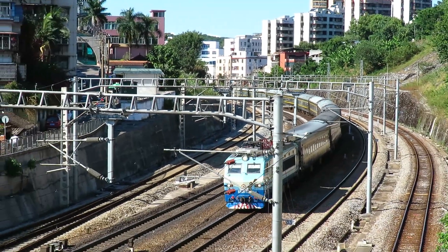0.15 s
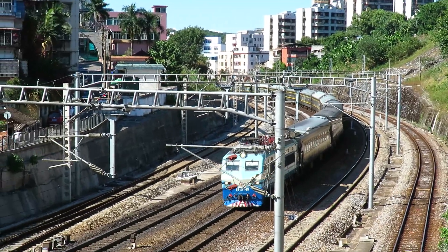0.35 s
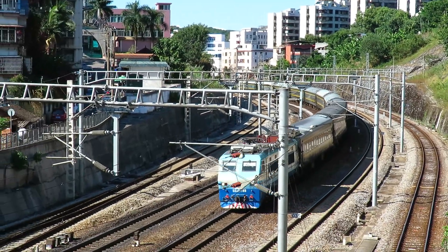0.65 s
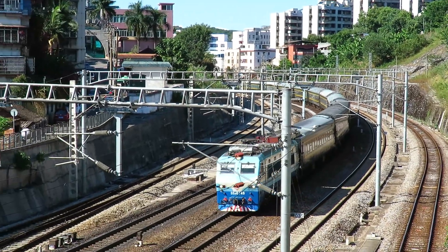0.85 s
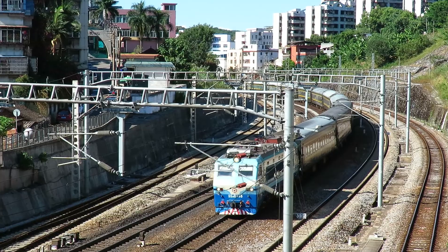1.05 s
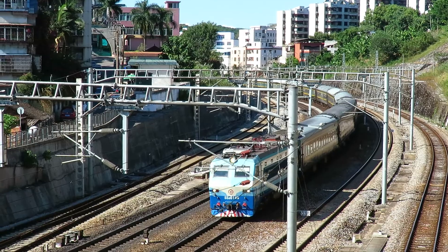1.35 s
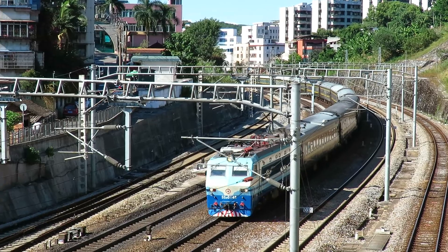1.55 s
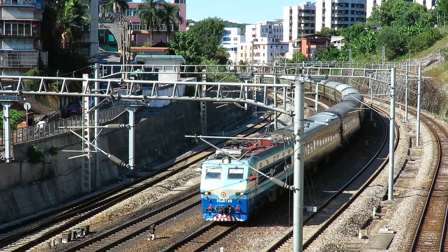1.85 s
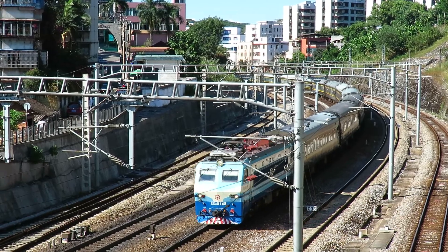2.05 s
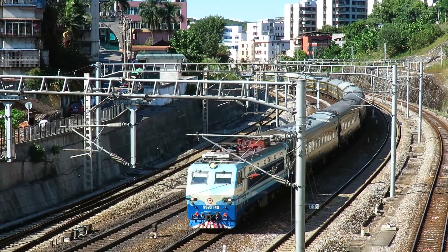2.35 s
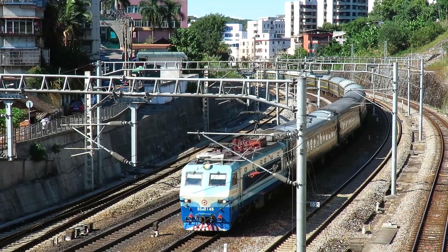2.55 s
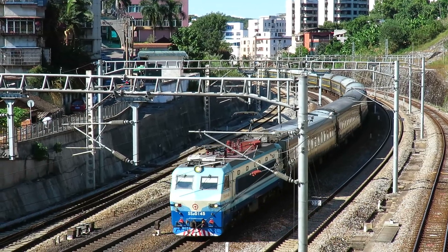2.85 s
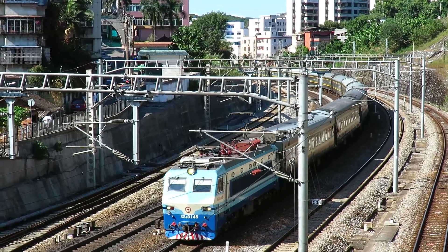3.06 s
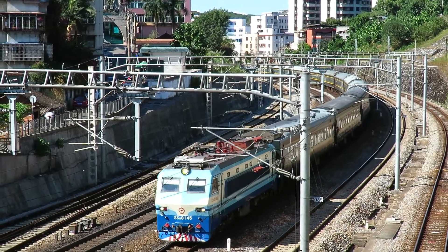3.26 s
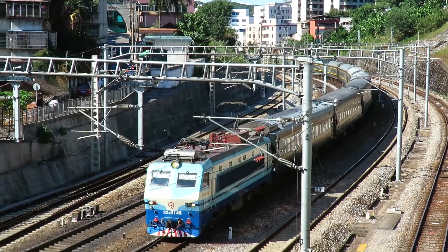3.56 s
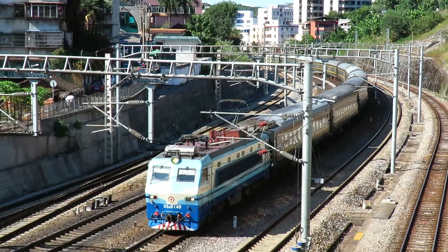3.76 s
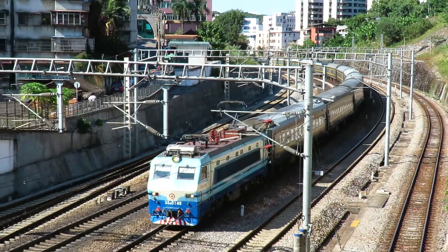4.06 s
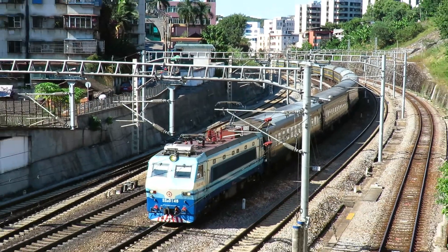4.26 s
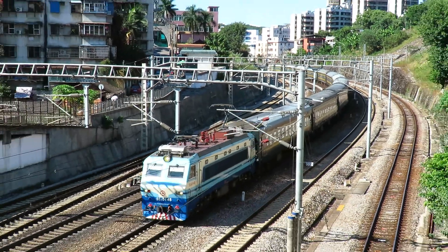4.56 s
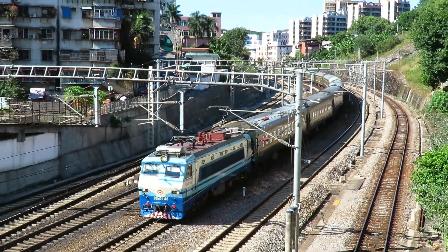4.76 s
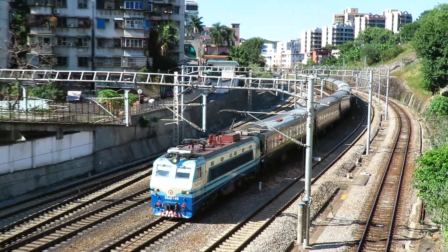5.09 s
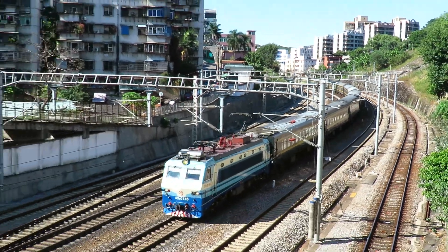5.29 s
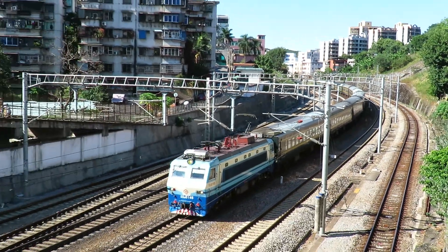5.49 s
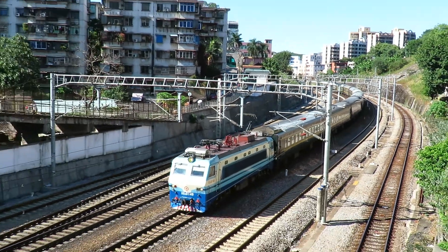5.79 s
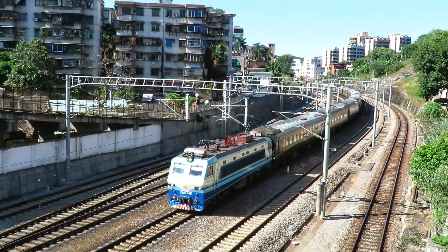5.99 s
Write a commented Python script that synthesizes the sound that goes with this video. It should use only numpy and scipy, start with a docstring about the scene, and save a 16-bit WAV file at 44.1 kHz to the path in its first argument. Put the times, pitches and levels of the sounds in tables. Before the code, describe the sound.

An electric locomotive, still far off, sounds one long, loud horn blast on a steady, slightly fluttering note. The horn cuts off suddenly and its echoes come back from surrounding walls and houses. Then the rumble of the wheels swells as the train approaches, with a wavering whine of blowers and gears and a few dull knocks. It is heard outdoors from above a railway cutting.

```python
"""Air horn in a railway cutting

From above a walled cutting: an electric locomotive, still far round the curve, sounds one long blast.
Each partial of the reed beats with its reflection from the nearest wall; once the horn is shut off,
walls and houses return it, Doppler-lowered. Then the wheels' rumble closes in on the microphones,
with the whine of blowers and gears, a low hum, a few knocks and a faint, narrow hiss near 12 kHz."""
import sys
import numpy as np
from scipy import signal
from scipy.fft import rfft, irfft, next_fast_len
from scipy.io import wavfile

SR = 44100
rng = np.random.default_rng(int(sys.argv[2]) if len(sys.argv) > 2 else 0)


def to_wav(s):
    """Save 16-bit WAV."""
    ch = np.atleast_2d(s).T  # columns
    pcm = np.round(np.clip(ch, -1, 1) * 32767)  # PCM
    wavfile.write(sys.argv[1], SR, pcm.astype(np.int16))


N = 270333
TIME = np.arange(N) / SR
HORN_OFF_S = 2.861
LEFT_RIGHT = np.array([[1], [-1]])  # opposite signs at the two microphones
FAR = np.clip(3.9 - TIME, 0, 1)  # 1 while the train is distant, 0 once it is near

# Horn pitch at the microphones, sagging as the valve shuts: (time [s], pitch [Hz])
HORN_PITCH = [(0, 417.7), (.5, 417.9), (1.2, 417.55), (2.0, 417.45), (2.7, 417.3), (2.95, 416.3)]
# Roar of the nearing wheels; hiss, gears and blower overtones follow it: (time [s], level [dB])
WHEEL_ROAR = [(0, -51.5), (2.9, -52.5), (3.9, -42.5), (4.3, -38), (4.75, -33.5), (5.72, -23.5),
              (6.13, -23.5)]


def horn(flutter_hz=38.64, throb=1.3, scatter_hz=18, wall_lag_s=0.051, release_s=0.031, ring_s=0.63):
    """A distant, fluttering reed chops air into pulses; each partial beats with its wall reflection."""
    # The reed's flutter sets in as the blast goes on: (time [s], phase swing [rad])
    flutter_depth = [(0, 0.0054), (1.1, 0.042), (1.45, 0.058), (2.9, 0.059)]
    # Moving air scatters part of each partial: (time [s], share against the steady part [ratio])
    air_scatter = [(0, 0.26), (1.2, .24), (1.5, 0.14), (2.9, 0.32)]
    # The horn's two treble bands: (time [s], blare level [dB], sizzle level [dB])
    treble_levels = [(0.0, -29, -39), (0.53, -31.5, -42), (0.68, -29.5, -40), (1.15, -31.5, -45.5),
                     (1.25, -30.5, -43), (1.49, -30, -40), (1.66, -26.5, -38.5), (1.75, -28.5, -41),
                     (2.74, -34.5, -42), (2.84, -30.5, -42)]
    phase = turn(curves(HORN_PITCH)[0]) + 0.013 * walk(16) + 0.016 * walk(81)  # jitter and rasp
    flutter = turn(flutter_hz + 0.5 * walk(3.9))
    swing, = curves(flutter_depth)
    scatter, = curves(air_scatter)
    treble_db = [db - 2 for db in curves(treble_levels)]
    multiples, timbre_db = horn_partials()
    bands = np.digitize(multiples, [7.5, 15.5])  # low, blare, sizzle
    out = np.zeros((2, N))
    for k, db, band in zip(multiples, timbre_db, bands):
        if band == 0:
            level_db, reflected, beat = low_partial(k)
            level_db = level_db + 0.56 * walk(16)
        else:
            share_db = db - 10 * np.log10(np.sum(undb(timbre_db[bands == band]) ** 2))
            level_db = treble_db[band - 1] + share_db - 0.5 * walk(16) + 1.53 * walk(6)
            reflected = 0.23 / (1 + (k * HORN_PITCH[0][1] / 4500) ** 2)  # the wall dulls the top
            beat = turn(k * 1.9) + 2 * np.pi * rng.random()
        # short waves scatter more, differ more between microphones and die first as pressure falls
        shortness = np.sqrt(k / 6)
        balance = 1 + (undb(0.72) - 1) * shortness * walk(3.4) * LEFT_RIGHT
        gain = undb(level_db + path_fading(k)) * balance
        # the paths outdoors shift each partial's flutter and turn more of it into throbbing
        shifted = flutter + 0.1 * (k - 1) * walk(1.8)
        throbbing = 1 + throb * swing * np.sqrt(k) * np.cos(shifted - 1.12)
        vibrato = swing * np.sin(shifted) / np.hypot(1, k / 26)
        # the ground reflection slowly turns the phase of the long waves
        bent = k * (phase + vibrato) + 1.96 * walk(1.39) / (1 + (k / 8) ** 2)
        mic_phase = (0.15 * shortness + 0.0066 * max(k - 12, 0)) * walk(1.8) * LEFT_RIGHT
        direct = tone(bent + mic_phase, scatter * shortness, scatter_hz)
        direct *= fade(HORN_OFF_S, release_s / shortness)
        # the reflection ends later, and the long waves ring on in the cutting
        wall = reflected * np.sqrt(2) * np.cos(bent - beat) * fade(HORN_OFF_S + wall_lag_s, ring_s / k)
        out += gain * throbbing * (wall - direct)
    return pan(out + reed_air(phase), -1.7)


def horn_partials(count=36):
    """The reed's sharp pulses hold a long harmonic series: its multiples and their levels in dB."""
    # Horn timbre: (multiple of the pitch, level [dB])
    timbre = [(1, -9.5), (2, -2.5), (3, -3.5), (4, -2), (5, -4.5), (6, -6), (7, -8), (8, -11.5), (9, -13),
              (10, -14.5), (11, -18.5), (12, -17.5), (13, -20), (14, -23), (15, -23), (16, -26.5),
              (17, -28.5), (19, -29.5), (21, -30), (24, -32), (29, -36), (31, -36), (33, -42), (36, -47)]
    multiples = np.arange(1, count + 1)
    return multiples, np.interp(multiples, *np.transpose(timbre))


def low_partial(k):
    """A low partial beats with its Doppler-shifted reflection: level in dB, reflected share, phase."""
    # Beats off the nearest wall: (multiple, level [dB], trend [dB/s], reflected share [0-1],
    # first dip [s], beat rate [Hz], quickening [Hz/s])
    wall_beats = [(1, -25.5, 0.45, 0.38, 0.75, 0.79, 0.37), (2, -20, -1, 0.53, 0.3, 2.75, 0.347),
                  (3, -22, 0, 0.32, 0.018, 3.348, 0.788), (4, -31, 3.5, 0.28, 0.12, 6.8, 0),
                  (5, -27, -0.5, 0.38, 0.073, 5.9, 1.126), (6, -33, 0.86, 0.04, 0.02, 2.6, 0),
                  (7, -29, -6, 0.23, 0.033, 6.3, 0.7)]
    _, db, trend, reflected, dip_s, beat_hz, quickening = wall_beats[k - 1]
    beat = turn(beat_hz + quickening * TIME)
    return db + trend * TIME, reflected, beat - np.interp(dip_s, TIME, beat)


def path_fading(k):
    """Paths to the microphones cancel or add now and then, so partial k dips or swells, in dB."""
    # Dips and swells: (time [s], multiple, half length [s], change [dB])
    changes = [(0.09, 11, 0.11, 8.5), (0.105, 12, 0.055, -22), (0.113, 5, 0.019, -16),
               (0.12, 1, 0.057, -18), (0.187, 7, 0.03, -12), (0.202, 10, 0.12, -11), (0.275, 5, 0.032, -27),
               (0.304, 13, 0.22, 6.5), (0.31, 1, 0.033, 5.5), (0.325, 2, 0.055, 6.5), (0.38, 4, 0.037, 8),
               (0.46, 6, 0.11, 7), (0.5, 12, 0.09, -12), (0.54, 9, 0.17, -14), (0.587, 1, 0.063, 4),
               (0.588, 2, 0.049, 7), (0.617, 5, 0.16, 5), (0.618, 3, 0.032, -29), (0.71, 8, 0.072, 7),
               (0.765, 12, 0.21, 0.5), (0.773, 4, 0.013, 6), (0.793, 1, 0.077, -22), (0.9, 4, 0.04, 5.5),
               (0.907, 1, 0.018, -23), (0.978, 3, 0.037, 4.5), (1.12, 11, 0.085, -10),
               (1.076, 1, 0.082, -17.5), (1.114, 6, 0.038, 3), (1.123, 7, 0.12, -6), (1.2, 2, 0.049, -10.5),
               (1.21, 4, 0.03, -14), (1.267, 10, 0.044, -9), (1.288, 2, 0.06, 10.5), (1.296, 3, 0.076, -2),
               (1.31, 9, 0.13, 3), (1.34, 13, 0.034, -7), (1.384, 2, 0.052, -13), (1.53, 2, 0.054, -9),
               (1.566, 6, 0.66, 5.5), (1.6, 5, 0.011, -28), (1.804, 2, 0.017, -9), (1.808, 3, 0.039, -4.5),
               (1.812, 5, 0.35, -8), (1.854, 11, 0.19, 2), (1.873, 9, 0.036, -11), (1.993, 5, 0.092, 9.5),
               (2.001, 6, 0.11, -5.5), (2.062, 1, 0.51, -8), (2.12, 4, 0.042, 3), (2.246, 4, 0.096, 4.5),
               (2.278, 1, 0.081, -28), (2.28, 2, 0.16, -5.5), (2.306, 7, 0.16, 12), (2.468, 8, 0.099, 7),
               (2.527, 2, 0.18, 4), (2.565, 5, 0.03, -4), (2.587, 8, 0.08, -10), (2.594, 7, 0.065, 13),
               (2.617, 1, 0.041, -6), (2.665, 4, 0.11, -7.5), (2.666, 3, 0.016, -3), (2.83, 12, 0.054, 8),
               (2.831, 6, 0.078, 7), (2.9, 3, 0.089, -7), (2.923, 1, 0.024, -26), (2.944, 3, 0.018, 15.5),
               (3.063, 1, 0.05, 4)]
    return sum(db * np.exp(-((TIME - s) / half_s) ** 2)
               for s, multiple, half_s, db in changes if multiple == k)


def reed_air(phase, low_hz=1700, high_hz=4300, tail_s=0.51):
    """Air rushes through the reed once a cycle and dies away slowly after the valve shuts."""
    # Rush of air: (time [s], level [dB])
    air_level = [(0, -46), (1.1, -49.5), (1.5, -54), (2.2, -56), (2.85, -59)]
    rush = rng.standard_normal((2, N)) * (1 + np.cos(phase))
    air = shape(rush, lambda f: 1 / np.sqrt((1 + (low_hz / (f + 1)) ** 8) * (1 + (f / high_hz) ** 6)))
    return unit(air) * undb(curves(air_level)[0]) * fade(HORN_OFF_S, tail_s)


def echoes(count=88, doppler=0.0035, behind_doppler=0.035, glint_hz=11, spread_db=4):
    """Walls and houses return the blast late and dull; those behind the train return it flatter."""
    # Echo strength by lateness: (delay [s], level [dB])
    echo_levels = [(.05, -28), (.14, -26), (.27, -36.5), (.42, -45), (.6, -40), (.8, -49.5), (1.3, -51),
                   (1.75, -51)]
    # The echoes stay low during the blast and swell once it stops: (time [s], gain [dB])
    swell = [(0, -16), (2.7, -17.5), (3.0, -13), (3.2, -6), (3.5, -2.5), (4.2, -9)]
    multiples, timbre_db = horn_partials()
    pitch = np.mean(np.array(HORN_PITCH)[:, 1])
    # the bell spreads its lowest partial all round, so the walls return more of it
    radiated = undb(timbre_db + 6 / multiples ** 2)
    cycle = np.arange(2048) / 2048
    # the moving horn's beam sweeps over ledges and windows, so every echo glints
    glints = [walk(glint_hz) for _ in range(12)]
    out = np.zeros((2, N))
    for i, (place, angle, side, lag) in enumerate(rng.random((count, 4))):
        delay = 0.1 + 1.675 * ((i + place) / count) ** 2.31
        behind = i % 4 == 3
        hz = pitch * (1 - (behind_doppler if behind else doppler) * angle)
        # a rough face gives each partial its own strength and lag
        face = rng.standard_normal((len(multiples), 2)) @ [1, 1j]
        dulling = 1 / 4700 + delay / 3500 + behind / 1400  # more with distance and behind the bell
        gains = face * radiated * np.exp(-multiples * pitch * dulling / 2)
        wave = np.real(gains @ np.exp(2j * np.pi * np.outer(multiples, cycle)))
        gate = np.clip((HORN_OFF_S + delay - TIME) / 0.034, 0, 1)
        level = undb(np.interp(delay, *np.transpose(echo_levels))) * glints[i % len(glints)]
        mic_lag_s = 0.0001 * (lag - 0.5) * LEFT_RIGHT
        index = (hz * (TIME + mic_lag_s) * len(cycle)).astype(int) % len(cycle)
        out += pan(wave[index] * gate * level, spread_db * (2 * side - 1) - 6)
    return out * undb(curves(swell)[0])


def rolling():
    """Wheels shake the bodies (rumble, hum), ring the rails (roar) and hiss, swelling as they near."""
    # Rumble at the microphones: (time [s], level [dB])
    rumble_level = [(0, -37), (.6, -37), (1.4, -36), (1.6, -36.5), (2.3, -43), (2.58, -41), (2.8, -49),
                    (3.28, -45.5), (3.38, -35.5), (3.8, -40.5), (4.2, -36.5), (4.6, -32.5), (5.2, -27.5),
                    (5.7, -23.5), (6.13, -23)]
    # Spectrum of the rolling noise: (frequency [Hz], density [dB])
    spectrum = [(25, -45), (45, -14.5), (100, -6.5), (140, -6.5), (200, -8.5), (270, -10), (340, -11),
                (430, -11), (580, -13), (900, -11.5), (1400, -18), (2500, -25), (4000, -38.5), (6500, -50),
                (9000, -55), (15000, -67.5)]
    # Stereo width of the train: (frequency [Hz], side minus mid [dB])
    stereo_width = [(30, -23), (80, -3.5), (160, 4.5), (380, 2), (700, -10.5), (1300, -9), (2400, -9),
                    (4400, -6), (9000, 3)]
    # Hum and body resonances: (frequency [Hz], width [Hz], level against the rumble [dB])
    resonances = [(103.3, 5.4, -12.5), (147.1, 13, -7), (269.6, 59, -3.5)]
    rumble_db = curves(rumble_level)[0] + walk(4.1)
    roar_db, = curves(WHEEL_ROAR)
    thinning_db = 4 * np.clip(3.6 - TIME, 0, 1)  # less bass from far off
    # Noise bands: (low edge [Hz], high edge [Hz], level [dB])
    bands = [(20, 170, rumble_db - 4.5 - thinning_db), (150.5, 325, rumble_db - 5.5),
             (325, 467, np.minimum(rumble_db, roar_db + 20) - 8),
             (597, 2550, roar_db - 0.8), (2730, 13000, roar_db - 16.5)]
    out = 0
    for low, high, db in bands:
        def colour(f):
            skirts = np.sqrt((1 + (low / (f + 1)) ** 12) * (1 + (f / high) ** 12))
            return undb(on_log(f, spectrum)) / skirts
        mid = shape(rng.standard_normal(N), colour)
        side = shape(rng.standard_normal(N), lambda f: colour(f) * undb(on_log(f, stereo_width)))
        flicker_db = 1.3 * walk(10) / (1 + low / 1200)  # the bass flickers, the hiss is smoother
        out += (mid + side * LEFT_RIGHT) / np.std(mid) * undb(db + flicker_db)
    for hz, width_hz, db in resonances:
        mid = tone(turn(hz), 3.8, width_hz)
        side = undb(-9) * tone(turn(hz), 20, width_hz)
        out += undb(rumble_db + db - 20 * FAR) * (mid + side * LEFT_RIGHT)
    return pan(out, -0.3)


def blowers(lower_ratio=0.97):
    """The blowers sing one wavering note with overtones; a second, slightly lower tone beats with it."""
    # Blower pitch at the microphones: (time [s], pitch [Hz])
    pitch = [(3, 501.5), (4.6, 501), (5.4, 499.8), (6.13, 498.8)]
    # Main note and its octave: (time [s], note level [dB], octave level [dB])
    levels = [(2.8, -58, -58.5), (3.4, -44.5, -54), (3.95, -40.5, -46.5), (4.23, -42.5, -44.5),
              (4.35, -35.5, -42), (4.5, -33, -50), (4.64, -31.5, -39.5), (4.72, -41, -39),
              (4.86, -35, -30.5), (4.97, -25, -42), (5.16, -26.5, -32), (5.3, -18.5, -30.5),
              (5.42, -23.5, -32), (5.52, -32, -32.5), (5.67, -21, -34), (5.9, -23, -29.5),
              (6.02, -19.5, -29.5), (6.13, -24, -25)]
    # Overtones that follow the wheels' roar: (multiple, relative level [dB])
    overtones = [(3, -7), (4, -9.5), (5, -18.5)]
    roar_db, = curves(WHEEL_ROAR)
    note_db, octave_db = curves(levels)
    lower_db = note_db + np.interp(TIME, [3, 5.45, 5.8], [-4, -11.5, -3.5])
    phase = turn(curves(pitch)[0])
    mid = undb(note_db) * tone(phase, 0.15, 20) + undb(octave_db) * tone(2 * phase, 0.3, 16)
    mid += undb(lower_db) * tone(lower_ratio * phase, 1.6, 9)
    for k, db in overtones:
        mid += undb(roar_db + db - 7 - 6 * FAR) * tone(k * phase, 0.45, 6)
    side = undb(note_db - 13) * tone(phase, 3.7, 13)  # thrown back by the side walls
    return pan(mid + side * LEFT_RIGHT, -2.5)


def gears(hz=403.7):
    """The gears whine lower and rougher than the blowers; the walls throw it back from the sides."""
    phase = turn(hz + 1.47 * walk(4.27))
    mid = tone(phase, 0.8, 28) + undb(-14) * tone(2 * phase, 1.5, 2.2)
    side = undb(-13) * tone(phase, 3.8, 22)
    return pan((mid + side * LEFT_RIGHT) * undb(curves(WHEEL_ROAR)[0] + 0.7), -2.5)


def knocks_and_ticks():
    """The running gear knocks dully, with a few light metallic ticks in between."""
    # Knocks: (time [s], relative peak [dB])
    knocks = [(3.77, -27), (3.9, -39), (4.055, -15.5), (4.65, -10), (4.778, -14.5)]
    # Ticks: (time [s], relative peak [dB])
    ticks = [(4.5094, -50), (4.554, -47), (4.5794, -49), (4.6079, -48)]
    return (strikes(knocks, band_hz=(110, 250), decay_s=0.001, gain_db=-6)
            + strikes(ticks, band_hz=(3500, 6800), decay_s=0.012, gain_db=5))


def strikes(blows, band_hz, decay_s, gain_db):
    """Each blow rings a broad resonance and dies quickly."""
    resonance = signal.butter(2, band_hz, "band", fs=SR, output="sos")
    out = np.zeros(N)
    for s, peak_db in blows:
        burst = rng.standard_normal(N) * (TIME > s) * fade(s, decay_s)
        ring = signal.sosfilt(resonance, burst)
        out += ring / np.abs(ring).max() * undb(peak_db + gain_db)
    return out


def thin_high_band(width_hz=380):
    """A faint, narrow hiss near 12 kHz, slowly falling."""
    # Course of the band: (time [s], centre [Hz], level [dB])
    course = [(4.4, 12800, -105), (4.8, 12650, -78), (5.15, 11950, -73), (5.55, 11700, -66),
              (5.72, 11650, -70), (5.85, 11600, -100)]
    hz, db = curves(course)
    noise = shape(rng.standard_normal((2, N)), lambda f: np.exp(-(f / width_hz) ** 2))
    return unit(noise * np.cos(turn(hz))) * undb(db)


def faint_hiss(at_s=3.59, half_s=0.12, hz=11500, db=-68):
    """One brief, high hiss from the train, barely reaching the microphones."""
    hiss = shape(rng.standard_normal((2, N)), lambda f: np.exp(-((f - hz) / 4000) ** 2))
    return unit(hiss) * undb(db) * np.exp(-((TIME - at_s) / half_s) ** 2)


def undb(db):
    """Decibels to gain."""
    return 10 ** (np.asarray(db) / 20)


def unit(x):
    """Scale to rms 1."""
    return x / np.sqrt(np.mean(np.abs(x) ** 2))


def curves(table):
    """Each column of a table joined by straight lines in time."""
    s, *columns = np.transpose(table)
    return [np.interp(TIME, s, c) for c in columns]


def on_log(hz, table):
    """Read (frequency [Hz], value) points on a log-frequency axis."""
    f, value = np.transpose(table)
    return np.interp(np.log(hz + 1), np.log(f), value)


def shape(x, gain):
    """Filter by a gain given as a function of frequency."""
    size = next_fast_len(x.shape[-1] + SR // 10)
    f = np.arange(size // 2 + 1) * SR / size
    return irfft(rfft(x, size) * gain(f), size)[..., :x.shape[-1]]


def walk(hz):
    """Smooth random drift of rms 1 that moves about hz times a second."""
    coarse = TIME[::40]
    f = np.arange(len(coarse) // 2 + 1) / TIME[-1]
    slow = irfft(rfft(rng.standard_normal(len(coarse))) * np.exp(-(f / hz) ** 2), len(coarse))
    return np.interp(TIME, coarse, unit(slow))


def turn(hz):
    """Running phase of a pitch curve."""
    return 2 * np.pi * np.cumsum(hz + np.zeros(N)) / SR


def tone(phase, scatter, hz):
    """A tone of rms 1: a steady part plus a scattered part, about hz wide, that beats with it."""
    in_phase = (np.sqrt(2) + scatter * walk(hz)) * np.cos(phase)
    quadrature = scatter * walk(hz) * np.sin(phase)
    return (in_phase + quadrature) / np.sqrt(1 + scatter ** 2)


def fade(start_s, decay_s):
    """Full level until start_s, then an exponential decay."""
    return np.exp(-np.clip((TIME - start_s) / decay_s, 0, 50))


def pan(x, db):
    """Place a sound, left minus right in dB."""
    return x * undb(LEFT_RIGHT * db / 2)


def scene():
    """The horn, its echoes and the nearing train, from above the cutting."""
    clatter = knocks_and_ticks()
    blast = echoes() + horn()
    return blast + rolling() + blowers() + gears() + clatter + thin_high_band() + faint_hiss()


def record(dry, knee=0.66, top_hz=15300):
    """The camera rounds the loudest peaks from its microphones and cuts the top."""
    rounded = dry / (1 + (dry / knee) ** 8) ** (1 / 8)
    return signal.sosfilt(signal.ellip(8, 0.2, 70, top_hz, fs=SR, output="sos"), rounded)


dry = scene()
out = record(dry)
to_wav(out)
```